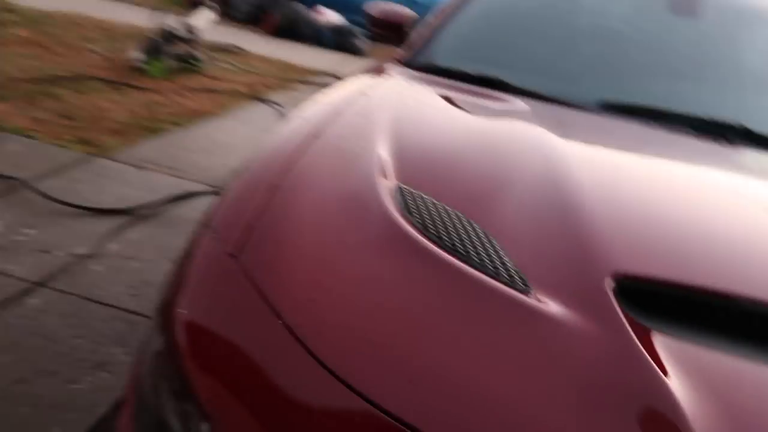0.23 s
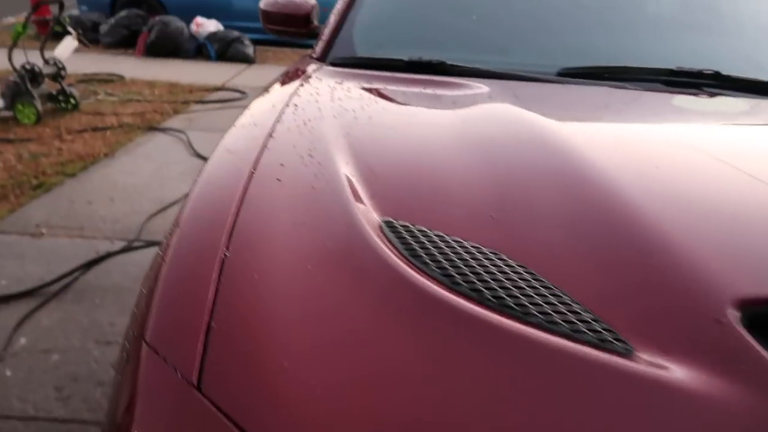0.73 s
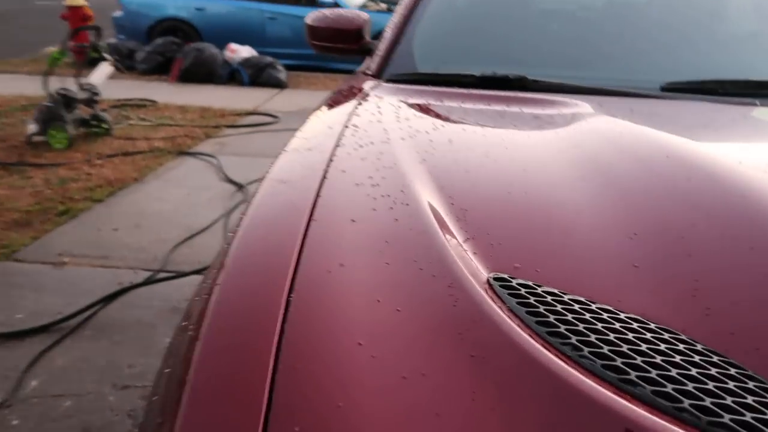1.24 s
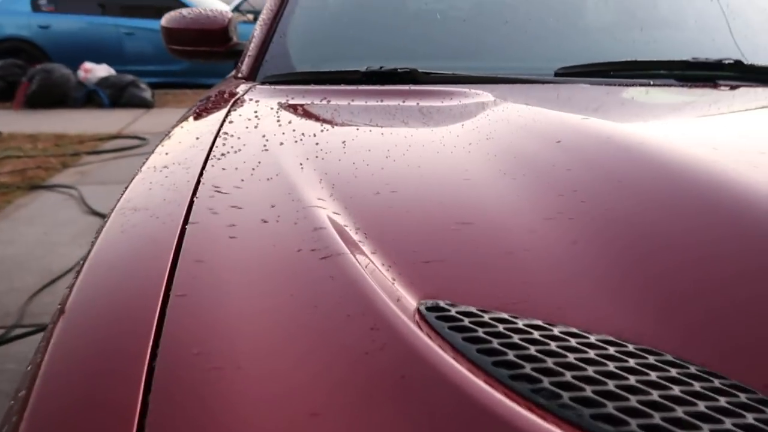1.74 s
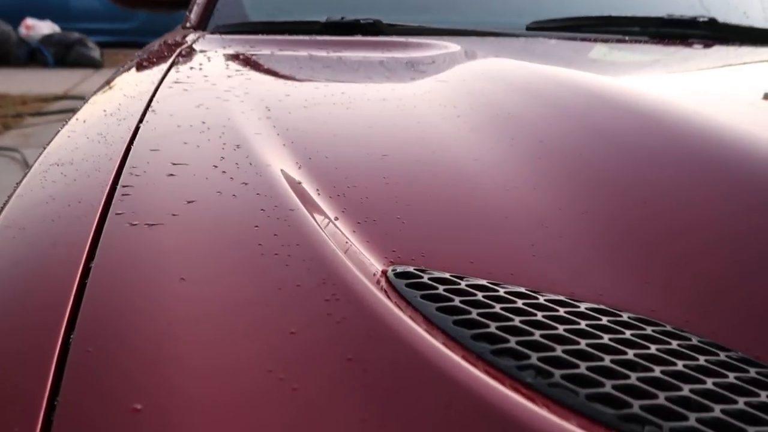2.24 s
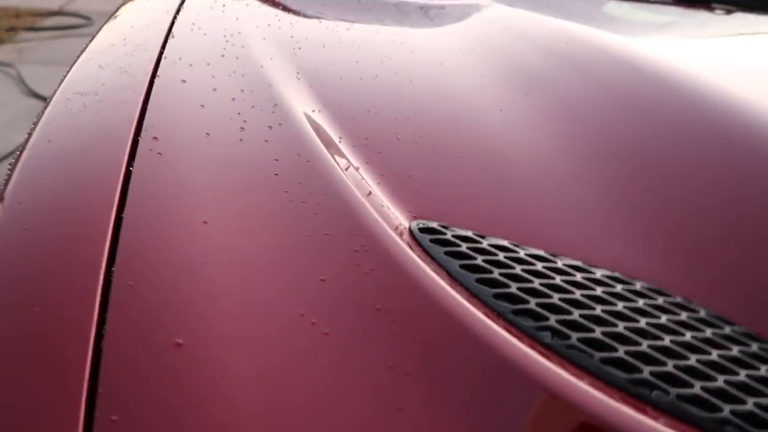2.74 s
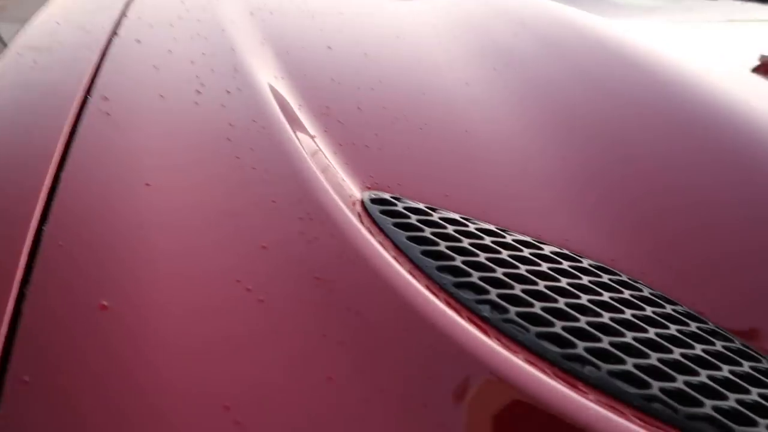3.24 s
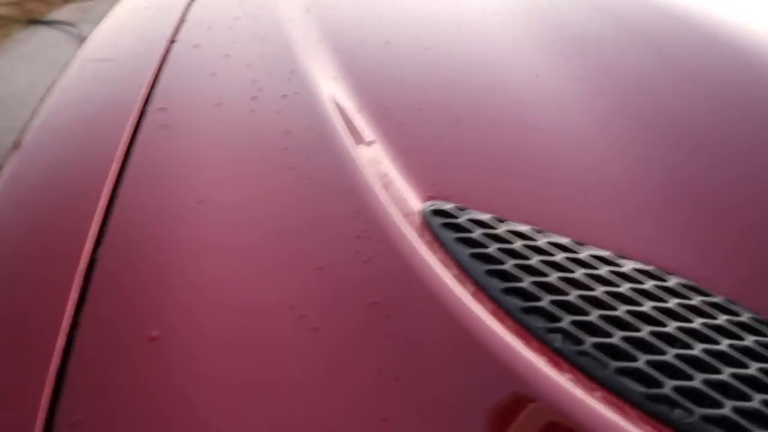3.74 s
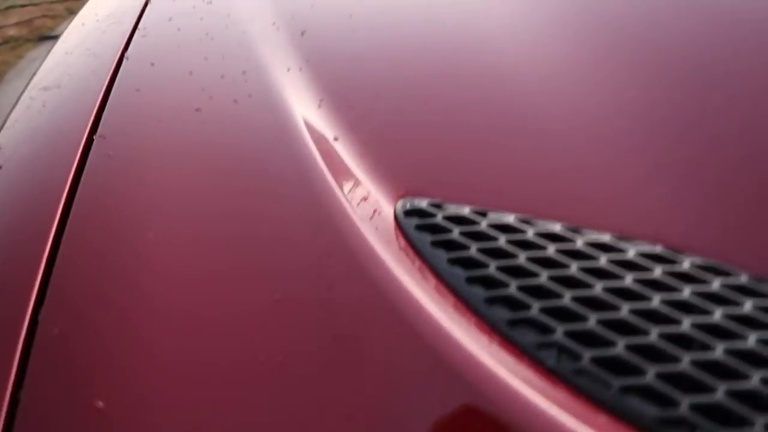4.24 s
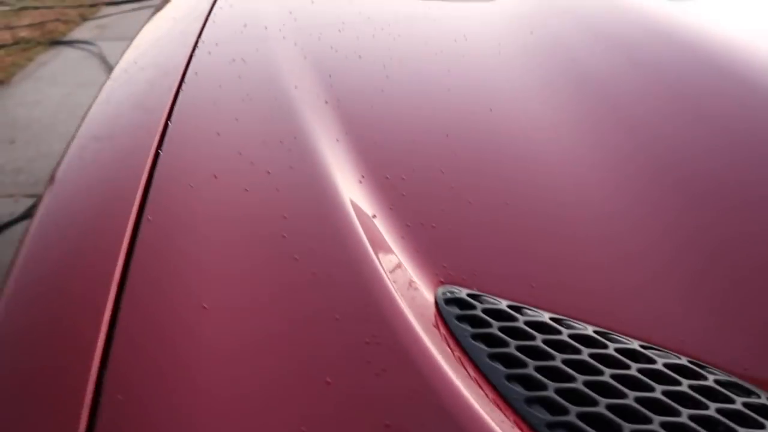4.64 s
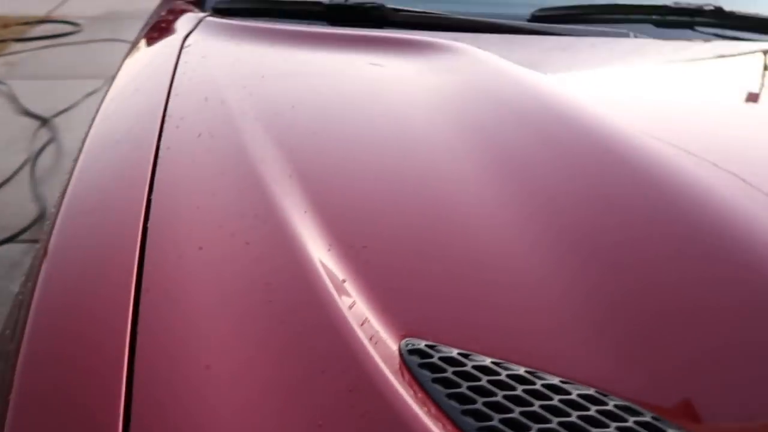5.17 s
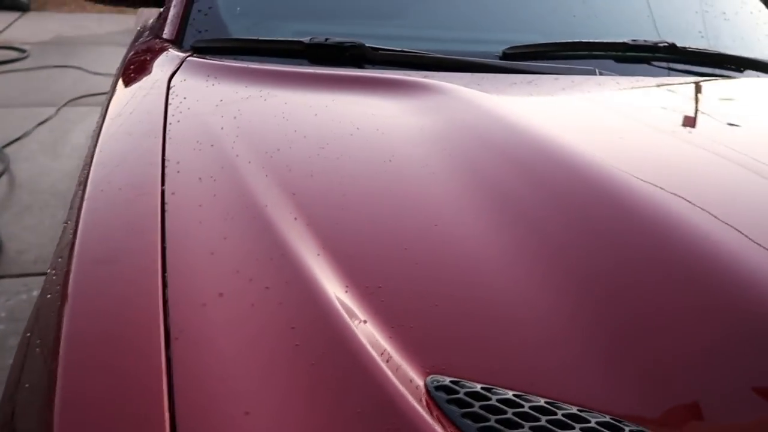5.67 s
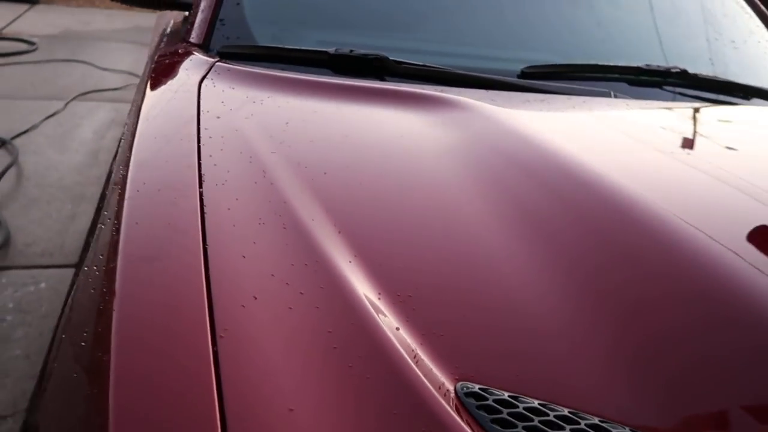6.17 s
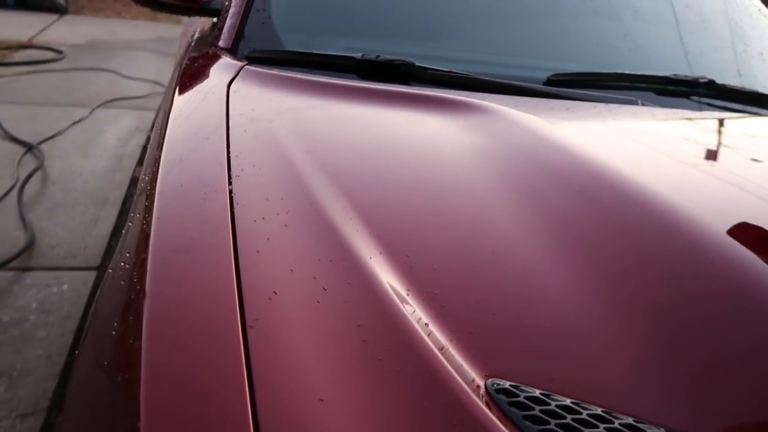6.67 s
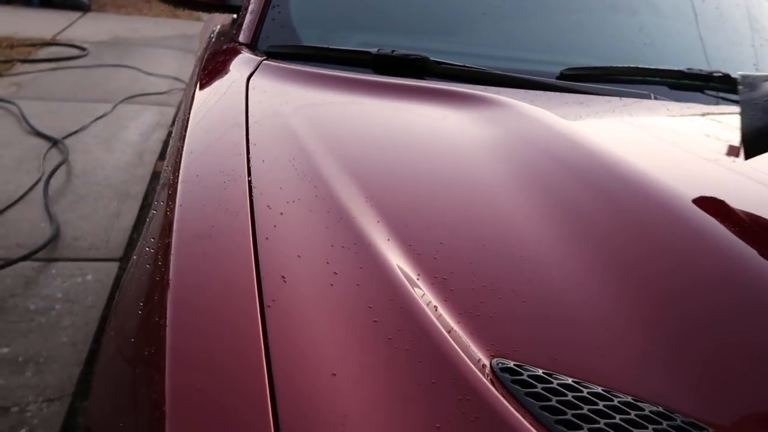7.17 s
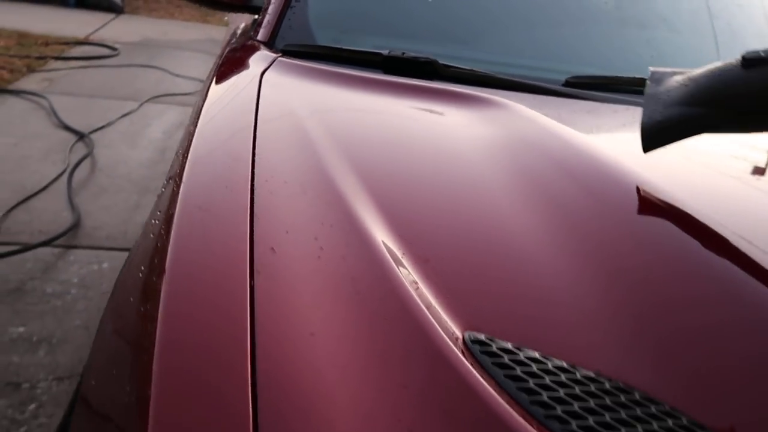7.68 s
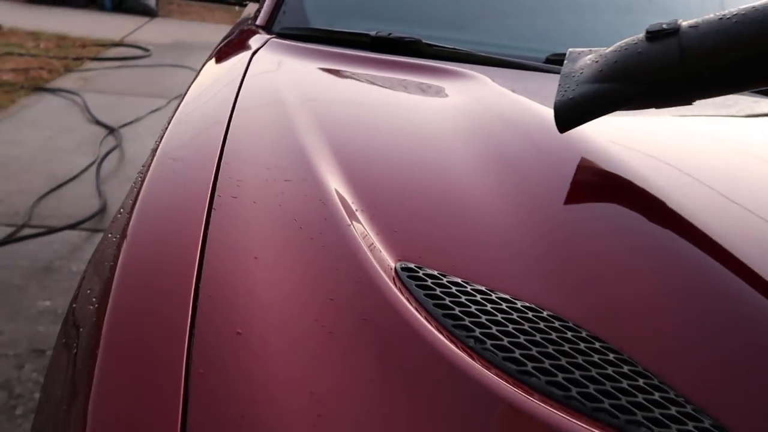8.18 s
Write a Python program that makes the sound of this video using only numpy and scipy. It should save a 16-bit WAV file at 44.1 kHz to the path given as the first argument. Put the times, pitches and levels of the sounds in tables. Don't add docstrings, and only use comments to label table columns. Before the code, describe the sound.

From the first instant a cordless blower is already at full power, close to a hand-held microphone on an open driveway. A strong, bright rush and hiss of air dominates over light rumble, with a low motor hum clearest at the start and a fluttering fan whine and breathy whistle near five kilohertz. From 0.5 to 3 s the jet changes colour gently, with hollow sweeps off the car bonnet and buffeting around 1.8 s. At about 3.2 s the microphone is covered; the roar turns dull, a loud low pop lands at 3.4 s, and the sound returns in jerks by 3.7 s, the top hiss fully clear around 3.9 s. Whistly resonances flicker near 4 and 4.7 s. The steady blast continues, with a faint bump at 6.6 s and stronger motor hum from 7.5 s, still running when it cuts off at 8.4 s.

```python
import sys
import numpy as np
from scipy import signal
from scipy.fft import rfft, irfft, next_fast_len
from scipy.io import wavfile
from scipy.ndimage import uniform_filter1d

SR = 44100
rng = np.random.default_rng(int(sys.argv[2]) if len(sys.argv) > 2 else 0)


def transcribe(u):
    v = np.clip(np.atleast_2d(u).T, -1, 1)
    q = np.round(v * 32767).astype(np.int16)
    wavfile.write(sys.argv[1], SR, q)


def ratio(d):
    e = np.asarray(d, float) / 20
    return 10 ** e


N = 370881

# low_hz, high_hz
LAYER_BANDS = [
    (80, 350),
    (500, 1800),
    (1800, 6000),
    (6000, 15000),
]
# freq_hz, density_db_per_hz
JET_COLOUR = [(30, -53), (90, -28.5), (170, -16), (300, -13), (600, -4.5), (1000, -1), (1600, -5),
              (2150, 0), (2900, -3),
              (3900, 0), (4600, -6), (5400, -6), (9500, -3), (11500, -4.5), (14000, -14), (15600, -27)]
AIR_SHARE_DB = [-3, -3.5, -.5]
# start_s, end_s, edge_s, level_db
TOP_SHUT = (3.21, 3.93, .07, -9)


def jet():
    frames, hz = N // 128 + 5, np.fft.rfftfreq(512, 1 / SR)
    t = np.arange(frames) * 128 / SR
    colour = np.transpose(JET_COLOUR)

    power = ratio(2 * read(*colour, np.arange(SR // 2)))
    levels = [db + share for db, share in zip(layers(t), AIR_SHARE_DB + [0])]
    layer_db = [db - 10 * np.log10(power[lo:hi].sum()) for db, (lo, hi) in zip(levels, LAYER_BANDS)]
    blend = np.array([read([280, 900, 3300, 9500], row, hz) for row in np.eye(4)])

    patches = rng.standard_normal((frames, len(hz)))
    patches = evened(uniform_filter1d(uniform_filter1d(patches, 24, 0), 8, 1)).T
    flicker = evened(uniform_filter1d(rng.standard_normal(frames), 14))

    field_db = blend.T @ layer_db + covered(hz[:, None], t) + gap(hz[:, None], t)
    field_db += 0.79 * patches
    field_db += 0.54 * flicker * np.clip(hz / 2500, 0, 1)[:, None]
    field_db[:2] += 0.61 * (levels[0] - levels[0].mean())
    field_db += held(t, *TOP_SHUT) * np.clip((hz - 7800) / 3000, -.4, 1)[:, None]

    white = signal.stft(rng.standard_normal((2, (frames - 1) * 128)), nperseg=512, noverlap=384)[2]
    field = white * ratio(field_db) * bonnet(hz[:, None], t)
    air = signal.istft(field, nperseg=512, noverlap=384)[1][:, :N]
    return np.sqrt(SR / 2) * coloured(air, lambda f: ratio(read(*colour, f)))


LAYER_LEVEL_DB = [
    -44.5,
    -28.5,
    -22,
    -20.5,
]
# time_s, downwash_on_camera_db, nearness_to_paint_db,
# rush_over_hiss_db
NOZZLE = [(0, -2, 0, -1), (.26, -2, 0, -1.4), (.9, -0.8, 0, -0.5), (1.48, 4.5, 2.5, -2.7),
          (1.83, 7, 0, -1.2), (2.2, -5.5, -2.5, 1.1), (2.85, 2.5, -3.5, -0.5), (3.18, 3, 0, 2.5),
          (3.71, 4.5, 3, -0.5), (3.99, -5, -3.5, 0.8), (4.3, -4.5, -1.8, -2.5), (4.73, -3.5, -3.5, -0.6),
          (5.0, -2.5, -5.5, 0.5), (5.4, -0.5, 0.5, -0.5), (5.85, -0.5, -1.3, 1.1), (6.59, 4, 3, 1.1),
          (7.89, 4, 2, 1), (8.41, 1.5, 1.8, 1.5)]
NOZZLE_SHARE = [
    (1, 0, 0),
    (0, 1, 0),
    (0, 0, 1),
    (0, 0, -.5),
]
# start_s, end_s, edge_s, level_db
HISS_SHUT = (3.228, 3.685, .035, -11)


def layers(t):
    s, *controls = np.transpose(NOZZLE)
    moves_db = [np.interp(t, s, control) for control in controls]
    db = np.array(LAYER_LEVEL_DB)[:, None] + np.array(NOZZLE_SHARE) @ moves_db
    return list(db[:-1]) + [db[-1] + held(t, *HISS_SHUT)]


# time_s, first_notch_hz, strength_0_to_1
BONNET_ECHO = [(0, 1070, 0), (.5, 2210, 0), (.9, 2550, 0.42), (1.5, 3100, 0.38), (1.9, 3070, 0),
               (3.4, 3140, 0.18), (3.7, 3260, 0), (3.9, 2680, 0.38), (4.05, 4080, 0.35), (4.5, 4500, 0.07),
               (4.75, 9100, 0.34), (5.4, 7250, .18), (6.0, 3700, 0.5), (6.4, 3100, 0.41), (7.0, 3700, .24),
               (8.41, 2610, .26)]


def bonnet(hz, t):
    s, notch_hz, strength = np.transpose(BONNET_ECHO)
    delay_s = .5 / np.interp(t, s, notch_hz)
    scatter = np.exp(-(hz * delay_s / 1.7) ** 2)
    strength = np.clip(np.interp(t, s, strength), 0, .9) * scatter
    return abs(1 + strength * np.exp(-2j * np.pi * hz * delay_s)) / np.sqrt(1 + strength ** 2)


# time_s, freq_hz, lift_db, half_length_s
GAP_RINGS = [(0, 2060, 10, 0.23), (1.25, 4220, 4.5, 0.8), (2.0, 2230, 0.5, 0.4), (3.146, 4570, 6.5, 0.06),
             (3.19, 6440, 0, 0.017), (3.71, 7800, 7.5, 0.024), (3.827, 6550, 5, .09),
             (3.964, 4780, 11, 0.067), (4.01, 11100, 0, 0.052), (4.156, 2260, 2.5, 0.073),
             (4.253, 9600, 1, 0.096), (4.397, 2250, 4, 0.3), (4.685, 4600, 9.5, 0.083),
             (5.0, 2240, 1.5, 0.41), (5.85, 8300, 4, 0.16), (6.15, 4540, 2, .1), (7.0, 2930, 0.5, 0.57)]


def gap(hz, t):
    lift_db = 0
    for s, f, db, half_s in GAP_RINGS:
        lift_db = lift_db + swells([(s, db, half_s)], t) * np.exp(-(np.log((hz + 1) / f) / 0.21) ** 2)
    return lift_db


# time_s, level_db
HUM = [(0, -27), (.17, -34), (.45, -39), (.75, -40), (.95, -34), (1.2, -38.5), (1.44, -42), (1.56, -37),
       (1.9, -44), (2.45, -47), (3.1, -43.5), (3.72, -40), (4.1, -51), (4.8, -45), (5.13, -44), (5.85, -38),
       (7.67, -31.5), (8.41, -32)]
# time_s, speed_hz
SHAFT_SPEED = [(0, 407.6), (.95, 407.8), (1.4, 409.0), (1.9, 407.6), (2.6, 406.7), (3.75, 405.8),
               (4.05, 406.1), (4.27, 407.3), (4.62, 406.4), (5.15, 407.2), (6.05, 407.6), (6.7, 406.8),
               (7.2, 406.7), (7.9, 407.1), (8.41, 406.2)]
TONE_LEVEL_DB = [
    -43.5,
    -41.5,
    -41,
]
WEAK_ORDERS = dict(zip([4, 5, 6, 7, 8, 9, 10, 11, 24], [-44, -42, -43, -43, -41, -44, -50, -45, -42]))
# time_s, lift_db, half_length_s
SWELLS_ORDER_2 = [(0.445, 10, .18), (1.08, 5.5, .15), (1.42, -10, .12), (1.7, -12, .07), (3.15, 9.5, 0.19),
                  (3.77, 12, 0.45), (4.197, -10, 0.076), (4.88, 5.5, 0.25), (5.43, 10, 0.34),
                  (6.0, 2, 0.33), (6.7, 7, 0.56), (7.4, 1, .25), (8.25, 14, 0.42)]
# time_s, lift_db, half_length_s
SWELLS_ORDER_3 = [(.05, 12, 0.18), (.55, -3, 0.039), (.93, 4, .1), (2.3, 2.5, 0.22), (3.9, 10.5, 0.21),
                  (4.35, 5, .25), (4.81, -14, .08), (5.45, 9, .25), (6.3, 11.5, 0.51), (7.05, 8, 0.31),
                  (7.7, 9, 0.43)]
# time_s, lift_db, half_length_s
SWELLS_BLADE_TONE = [(.17, 10.5, 0.22), (.5, 11, 0.095), (1.25, 10, 0.39), (1.55, 2, 0.11),
                     (1.84, -12, .05), (2.22, 10.5, 0.23), (2.62, 8.5, 0.16), (2.9, 10.5, 0.16),
                     (3.17, 14, 0.092), (3.53, 7, 0.074), (3.68, 11, .1), (3.96, 15.5, .1),
                     (4.27, 6, 0.079), (4.52, -3, 0.051), (4.81, 14.5, 0.092), (5.13, 10, 0.15),
                     (5.42, 6, 0.12), (5.6, 9, .1), (6.11, 13, 0.11), (6.37, 10, 0.14), (6.71, 4, 0.088),
                     (7.2, 6, 0.33), (7.58, 5, 0.16), (7.88, 14.5, 0.21), (8.32, 11.5, 0.22)]


def motor():
    blades = 12
    t = np.arange(N) / SR
    speed_hz = np.interp(t, *np.transpose(SHAFT_SPEED))
    turns = np.cumsum(speed_hz + 0.42 * slow(25, count=1)[0]) / SR

    *_, rush_db, hiss_db = layers(t)
    rush_db = np.minimum(rush_db + covered(3300, t) + 22.5, 2)
    hiss_db = hiss_db + covered(9500, t) + held(t, *TOP_SHUT) + 21

    levels = {1: np.interp(t, *np.transpose(HUM))}
    all_swells = (SWELLS_ORDER_2, SWELLS_ORDER_3, SWELLS_BLADE_TONE)
    for order, db, rows in zip((2, 3, blades), TONE_LEVEL_DB, all_swells):
        swell_db = np.interp(t, t[::64], swells(rows, t[::64]))
        levels[order] = db + swell_db + covered(order * speed_hz.mean(), t)
    for (order, db), drift in zip(WEAK_ORDERS.items(), slow(4, count=len(WEAK_ORDERS))):
        levels[order] = db + (rush_db if order < blades else hiss_db) + 2.5 * drift

    out = np.zeros(N)
    for (order, db), flutter in zip(levels.items(), slow(40, count=len(levels))):
        flutter_db = min(1.9 + 0.3 * order, 3.03) * flutter
        sine = np.sin(2 * np.pi * (order * turns + rng.random()))
        out += ratio(db + flutter_db) * np.sqrt(2) * sine

    blur_db = uniform_filter1d(levels[blades], 6000) + np.minimum(rush_db + 6, 0) / 2
    out += ratio(2.5 + blur_db) * whistle(blades * turns, width_hz=150)
    return out + ratio(-32 + hiss_db) * whistle(2 * blades * turns, width_hz=120)


def whistle(turns, width_hz):
    r = np.exp(-np.pi * width_hz / SR)
    blur = signal.lfilter([1 - r], [1, -r], rng.standard_normal(N) + 1j * rng.standard_normal(N))
    return evened((blur * np.exp(2j * np.pi * turns)).real)


# start_s, thud_db, thud_hz, length_s, burst_db
POPS = [
    (3.396, -14, 176, 0.0183, -18),
    (3.677, -43, 200, 0.014, -40),
    (6.585, -29, 199, 0.0186, -40),
]


def pops():
    out = np.zeros(N)
    leak = signal.butter(5, [1500, 6300], "bandpass", fs=SR, output="sos")
    for start_s, thud_db, thud_hz, length_s, burst_db in POPS:
        t = np.arange(0, 2 * length_s, 1 / SR)
        u = t - length_s / 2
        phase = 2 * np.pi * thud_hz * u
        thud = np.cos(phase) + 1.1 * np.cos(2.35 * phase + .3)
        thud += .3 * np.cos(1.7 * phase - .4) - .45 * np.sin(.6 * phase)
        thud *= np.exp(-(u / (0.27 * length_s)) ** 2)

        burst = evened(signal.sosfilt(leak, rng.standard_normal(len(t))))
        burst += ratio(-24) * evened(np.diff(rng.standard_normal(len(t) + 1)))
        burst *= (t / .009) ** 2 * np.exp(2 - 2 * t / .009)

        out[round(start_s * SR):][:len(t)] += ratio(thud_db) * thud + ratio(burst_db) * burst
    return out


# time_s, loss_db
COVER_LOSS = [
    (3.213, 0),
    (3.243, -11),
    (3.36, -25),
    (3.45, -17),
    (3.52, -7.5),
    (3.565, -8.5),
    (3.6, -2),
    (3.65, -6.5),
    (3.683, 0),
]
# freq_hz, share_of_loss
COVER_SHARE = [(300, 0.1), (800, 0.4), (1500, 1), (3300, 1), (5000, 0.96), (9500, 0.36)]


def covered(hz, t):
    return read(*np.transpose(COVER_SHARE), hz) * np.interp(t, *np.transpose(COVER_LOSS))


def swells(rows, t):
    return sum(db * np.exp(-((t - s) / half_s) ** 2) for s, db, half_s in rows)


def held(t, start, end, edge, db):
    return db * np.clip(np.minimum(t - start, end - t) / edge + .5, 0, 1)


def slow(rate_hz, count):
    t = np.arange(0, N + 256, 256) / SR
    f = np.geomspace(rate_hz / 20, rate_hz, 24)
    rows = np.sin(2 * np.pi * (f[:, None] * t + rng.random((count, len(f), 1)))).sum(1)
    return np.array([np.interp(np.arange(N) / SR, t, evened(row)) for row in rows])


def coloured(x, gain):
    size = next_fast_len(N)
    return irfft(rfft(x, size) * gain(np.fft.rfftfreq(size, 1 / SR)), size)[..., :N]


def evened(x):
    return x / np.sqrt(np.mean(x ** 2) + 1e-20)


def read(f, value, hz):
    return np.interp(np.log(hz + 1), np.log(np.asarray(f) + 1), value)


def scene():
    air = jet()
    return np.array([air[0] + motor() + pops(), air[1]])


def roll_off(x):
    return signal.sosfilt(signal.butter(12, 15750, fs=SR, output="sos"), x)


# freq_hz, difference_over_sum_db, difference_lag_rad, unrelated_share_0_to_1
PORTS = [(100, -46, .2, .6), (1000, -37, .2, .6), (1900, -16, .3, .5), (3000, -7, .5, .35),
         (4300, 0, .7, .25), (6000, 4.5, .9, .35), (7800, 8, 1.1, .4), (9000, 15, 1.15, .4),
         (14000, 24, 1.3, .4)]
# time_s, added_difference_db
FACING = [(0, 1), (.5, -1.7), (1, 4), (2, 1.3), (2.5, -1.5), (2.95, -0.7), (3.12, -3.5), (3.2, 0),
          (3.27, 4), (3.8, 4.5), (4.15, 2.5), (4.7, 5.5), (5.4, 1), (6.6, -2.5), (7.6, -1), (8, 0.4),
          (8.41, 0)]
# freq_hz, share_of_facing
FACING_SHARE = [(2000, .8), (5000, 0.37), (9000, 1.62)]
# start_s, end_s, edge_s, difference_db
SIDE_LATE = (3.69, 3.93, .05, 5)
# start_s, end_s, edge_s, difference_db
KNOCK_ALIKE = (3.39, 3.425, .01, -16)
# start_s, end_s, edge_s, difference_db
SIDE_OPEN = (3.23, 3.69, .05, 5)


def record(dry):
    hz, t, (shared, loose) = signal.stft(dry, SR, nperseg=512)
    f, *columns = np.transpose(PORTS)
    side_db, lag_rad, apart = (read(f, column, hz)[:, None] for column in columns)

    eddies = rng.standard_normal((len(t), len(hz)))
    eddies = evened(uniform_filter1d(uniform_filter1d(eddies, 6, 0), 8, 1).T)
    turning = read(*np.transpose(FACING_SHARE), hz)[:, None]
    side_db = side_db + turning * np.interp(t, *np.transpose(FACING))
    side_db = side_db + held(t, *SIDE_LATE) * np.clip(hz / 3000 - 1.2, 0, 1)[:, None]
    side_db = side_db + held(t, *KNOCK_ALIKE) * np.clip(hz / 2000 - 3, 0, 1)[:, None]
    side_db = side_db + held(t, *SIDE_OPEN) + 2.1 * eddies

    angle, apart = np.arctan(ratio(side_db)), np.clip(apart, 0, 1)
    side = np.sqrt(1 - apart) * np.exp(-1j * lag_rad) * shared + np.sqrt(apart) * loose
    side = np.sin(angle) * side
    ports = np.cos(angle) * shared + np.array([side, -side])
    ports = signal.istft(ports, SR, nperseg=512)[1][:, :N]
    low_cut = signal.butter(2, 55, "highpass", fs=SR, output="sos")
    return roll_off(signal.sosfilt(low_cut, ports))


dry = scene()
out = record(dry)
transcribe(out)
```